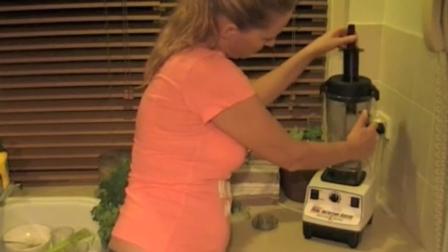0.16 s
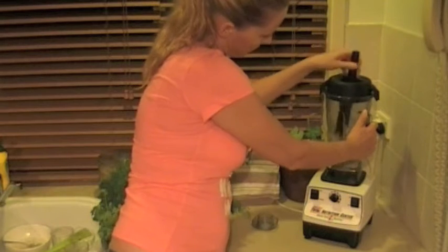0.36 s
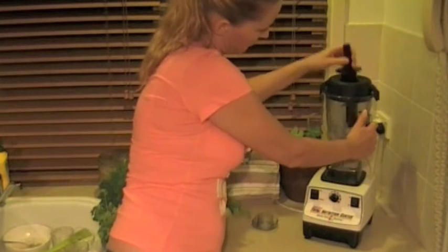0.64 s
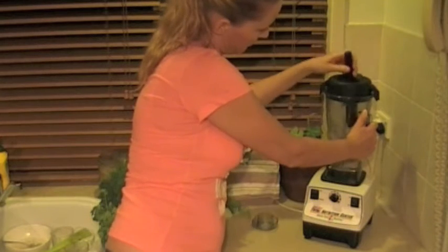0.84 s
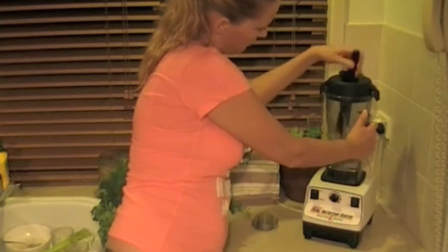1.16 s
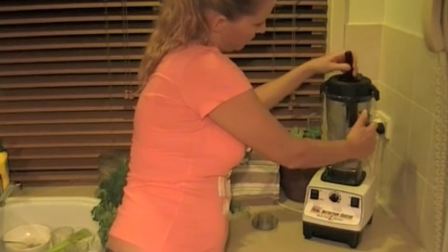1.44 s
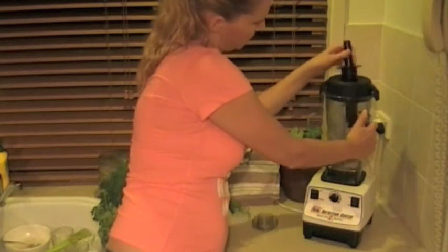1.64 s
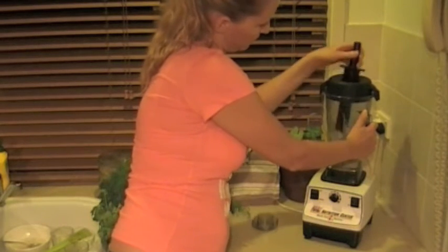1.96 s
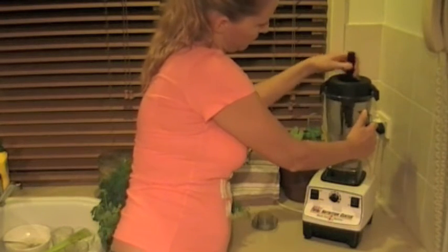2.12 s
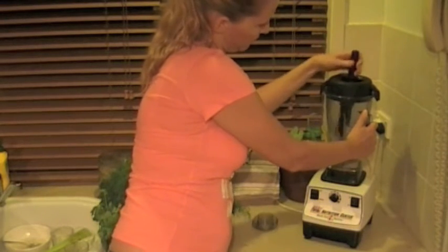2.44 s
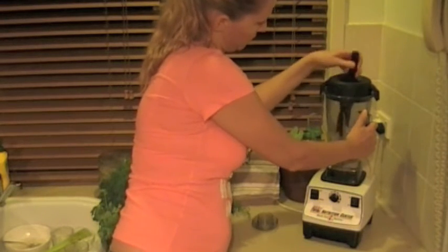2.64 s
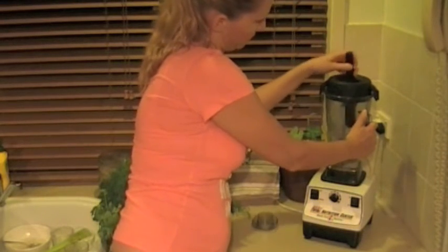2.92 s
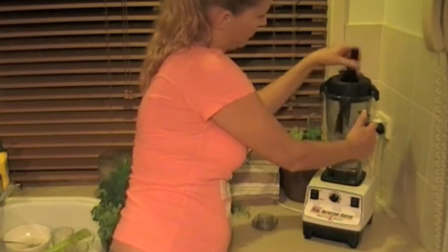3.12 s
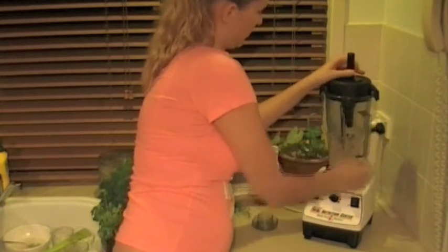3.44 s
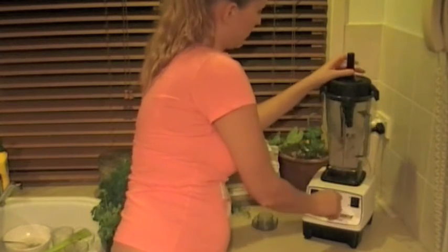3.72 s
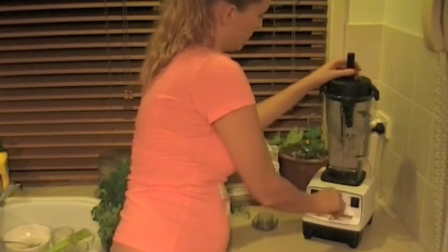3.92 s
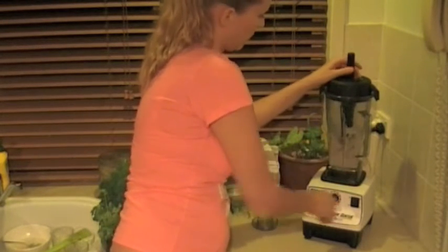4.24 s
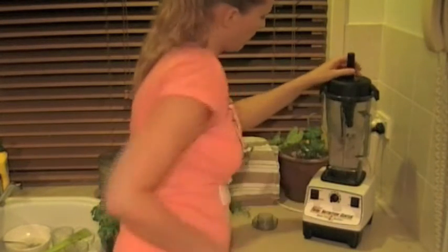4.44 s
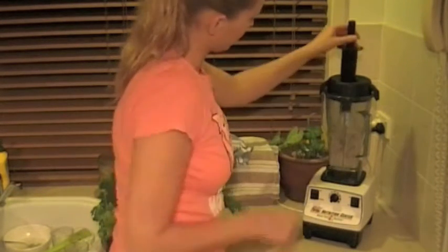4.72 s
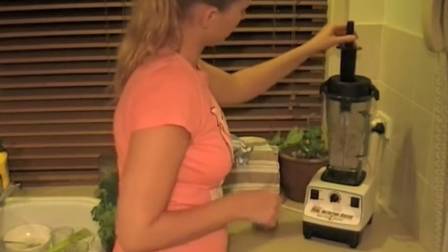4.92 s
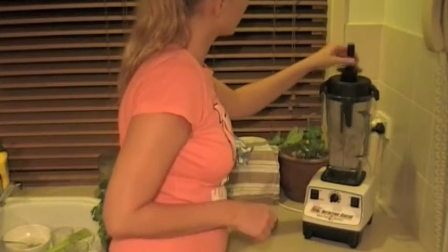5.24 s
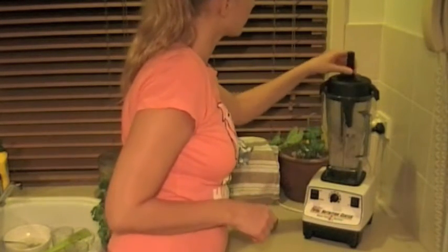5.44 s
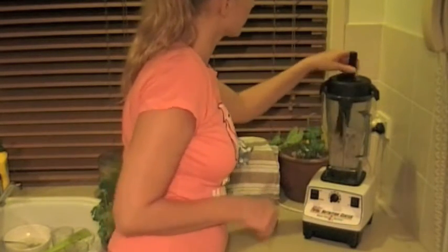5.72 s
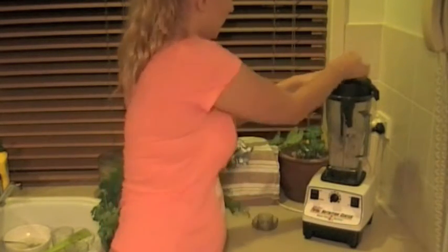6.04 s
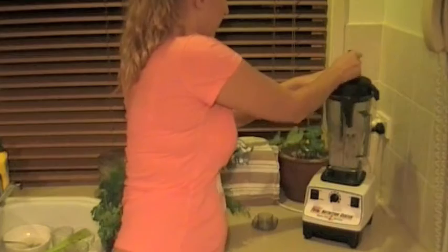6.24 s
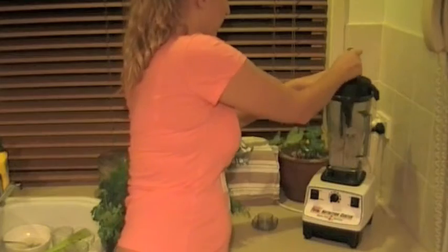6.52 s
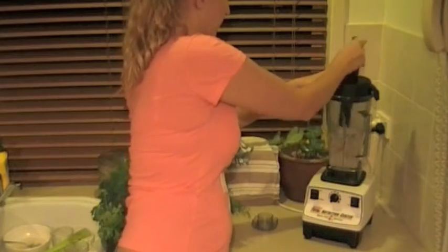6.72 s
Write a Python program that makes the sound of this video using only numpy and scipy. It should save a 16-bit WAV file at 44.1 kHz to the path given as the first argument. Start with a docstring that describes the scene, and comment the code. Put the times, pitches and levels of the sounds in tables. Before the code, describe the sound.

A blender runs on low, close by on a kitchen counter, buzzing and churning through greens with short dull thumps and faint gurgles. A little past halfway it switches to high and gets much louder, the motor sagging and recovering as the blades bite. About a second later it spins free, rising in pitch to a steadier whine with a bright rush of air. Tiled walls add brief reflections.

```python
"""A blender buzzes and churns on low in a tiled kitchen as a tamper pushes greens onto its blades.
The chopped mains shakes the motor and the blades ring the jar, with short thumps and faint gurgles.
Switched to high, the blades tear through the load and the shaft sags and recovers. Then it breaks
free and sings, with the rush of its fan and the whine of its commutator."""
import sys
import numpy as np
from scipy import signal
from scipy.fft import rfft, irfft
from scipy.io import wavfile
from scipy.ndimage import uniform_filter1d, map_coordinates

SR = 44100
rng = np.random.default_rng(int(sys.argv[2]) if len(sys.argv) > 2 else 0)


def store_pcm(level_fs):
    """Save levels as 16-bit WAV."""
    pcm = np.round(np.clip(level_fs, -1, 1) * 32767).astype(np.int16)
    wavfile.write(sys.argv[1], SR, np.atleast_2d(pcm).T)


N = 302967
T = np.arange(N) / SR
HZ = np.fft.rfftfreq(N, 1 / SR)
MAINS_HZ, FULL_SPEED_HZ = 50, 500
SWITCH_S, FREE_S = 3.77, 4.69  # the switch goes to high; the blades break free of the load

# Resonances and hollows of the jar and base. Each row: centre in Hz, width in Hz, lift in dB.
JAR_MODES = [(194, 10, -15), (327, 16, -1), (421, 38, -5), (455, 49, 8.5), (522, 54, 7), (570, 15, -19),
             (648, 20, -3), (758, 20, 4.5), (712, 22, 1), (900, 35, 4.5), (876, 23, 1), (969, 39, 3),
             (1059, 46, 6.5), (1180, 22, 0), (1266, 46, -3), (1449, 23, 4), (1702, 140, 3.5),
             (1898, 140, 5), (2483, 104, 4.5), (2883, 91, 3.5), (3250, 120, -1), (4840, 120, 4),
             (5054, 200, 2.5)]
# Resonances of the motor housing. Each row: centre in Hz, width in Hz, lift in dB.
HOUSING_MODES = [(3380, 90, 2), (3720, 300, 5.5), (6600, 300, 2.5), (7320, 170, 4), (8850, 220, 4),
                 (9600, 200, 2.5), (11020, 260, 2), (12200, 250, 1.5), (14180, 320, 4.2), (14620, 320, 3)]


def amp(db):
    """Decibels to gain."""
    return 10 ** (np.asarray(db) / 20)


def unit(x):
    """Scales to rms 1."""
    return x / np.sqrt(np.mean(x ** 2) + 1e-20)


def bumps(resonances, at=HZ):
    """Lift in dB of a set of resonances at the given frequencies."""
    return sum(lift / (1 + (2 * (at - hz) / width) ** 2) for hz, width, lift in resonances)


def spectrum(points, resonances=()):
    """An EQ curve in dB: a broad slope with resonant bumps on it."""
    hz, db = np.transpose(points)
    return np.interp(np.log(HZ + 1), np.log(hz), db) + bumps(resonances)


def colour(x, db):
    """Filters x by an EQ curve in dB."""
    return irfft(rfft(x) * amp(db), N)


def wander(rate_hz):
    """Smooth random drift of rms 1, rolling off above rate_hz."""
    return unit(irfft(rfft(rng.standard_normal(N)) / (1 + (HZ / rate_hz) ** 4), N))


def after(s, fade_s):
    """Fades from 0 to 1 around the time s."""
    return .5 + .5 * np.tanh((T - s) / fade_s)


def stages():
    """Crossfades for the three stages: on low, biting on high, spinning free."""
    high, free = after(SWITCH_S, .017), after(FREE_S, .03)
    return np.array([1 - high, high * (1 - free), high * free])


def staged(low_db, biting_db, free_db, speed=FULL_SPEED_HZ, db_per_octave=0):
    """A layer's fader in dB: the level of each stage at full speed, moved by the shaft speed."""
    return np.array([low_db, biting_db, free_db]) @ stages() + db_per_octave * np.log2(speed / FULL_SPEED_HZ)


def swells(rows, attack_s, release_s):
    """Fader moves in dB. Each row: start in seconds, length in seconds, lift in dB."""
    return sum(db * (1 - np.exp(-np.clip(T - s, 0, length) / attack_s))
               * np.exp(-np.maximum(T - s - length, 0) / release_s) for s, length, db in rows)


def rough_tone(cycles, width_hz, rough):
    """A tone whose level and phase shake; rough is the noisy share of its power."""
    shake = np.sqrt(1 - rough) + np.sqrt(rough / 2) * (wander(width_hz) + 1j * wander(width_hz))
    return np.sqrt(2) * (shake * np.exp(2j * np.pi * (cycles + rng.random()))).real


def spatter(per_s, spread_db, share):
    """Small impacts of uneven size in a bed of turbulence; share is their part of the power."""
    hits = (rng.random(N) < per_s / SR) * rng.choice([-1, 1], N)
    sizes = amp(spread_db * np.minimum(rng.exponential(1, N), 3))
    return np.sqrt(share) * unit(hits * sizes) + np.sqrt(1 - share) * rng.standard_normal(N)


def air_pockets(x, depth_db):
    """Pockets of air open and close in the pulp, so different pitches swell at different moments."""
    bands = signal.stft(x, nperseg=512, noverlap=384)[2]
    pockets = uniform_filter1d(rng.standard_normal(bands.shape), size=9, axis=0)
    pockets = unit(uniform_filter1d(pockets, size=14, axis=1))
    depth = np.interp(np.linspace(0, T[-1], bands.shape[1]), T, depth_db)
    return unit(signal.istft(bands * amp(depth * pockets), nperseg=512, noverlap=384)[1][:N])


def kitchen(x, t60=.25):
    """Dense reflections from tiles and counter."""
    t = np.arange(SR // 2) / SR
    taps = rng.standard_normal(len(t)) * (rng.random(len(t)) < 2000 / SR)
    taps *= amp(-60 * t / t60) * (t > .002)
    return signal.fftconvolve(x, taps / np.linalg.norm(taps))[:N]


def mains_buzz(hum_db=-73.5):
    """The speed control chops the mains and shakes the windings; bypassed on high, it leaves a hum."""
    # Mains harmonics on low. Each row: pitch in Hz, level in dB.
    harmonics = [(200, -73), (300, -71), (400, -66), (500, -47), (600, -48.3), (700, -53.5), (800, -59),
                 (900, -59), (1000, -55)]
    high = after(SWITCH_S, .017)
    buzz = sum(amp(db) * rough_tone(hz * T, width_hz=4, rough=.05) for hz, db in harmonics)
    hum = rough_tone(4 * MAINS_HZ * T, width_hz=8, rough=.3)
    return buzz * (1 - high) + amp(hum_db) * hum * high


def thumps_and_gurgles(rise_s=.011):
    """Short, damped thumps against the jar, and a few longer, faint low gurgling rings."""
    # Each row: time in seconds, level in dB, pitch in Hz, decay in seconds.
    events = [(.35, -48, 332, 0.051), (.718, -53, 380, .02), (.892, -53, 210, 0.018),
              (1.272, -52, 278, 0.02), (1.506, -53, 250, 0.018), (1.576, -48, 248, 0.023),
              (1.68, -50, 332, 0.035), (1.801, -57, 260, 0.024), (2.45, -50, 310, 0.035),
              (3.11, -38, 385, 0.034), (3.238, -59, 248, 0.025), (3.491, -59, 143, 0.22),
              (4.8, -43, 394, 0.12), (5.05, -49, 376, 0.14)]
    out = np.zeros(N)
    for s, db, hz, decay_s in events:
        age = np.maximum(T - s + rise_s, 0)
        envelope = (1 - np.exp(-age / rise_s)) ** 2 * np.exp(-age / decay_s)
        width_hz = 2.5 / decay_s  # the longer it lasts, the clearer its pitch
        band = HZ / (HZ + hz) / (1 + ((HZ - hz) / width_hz) ** 2) ** 2
        body = unit(irfft(rfft(rng.standard_normal(N)) * band, N))
        out += amp(db) * envelope / envelope.max() * body
    return out


def fan_rush(speed, slip_db, flutter_db=1.36):
    """The fan's rush through the housing, fizzing with spray; on high it is steadier and rings more."""
    # Colour of the rush. Each row: frequency in Hz, gain in dB.
    rush_eq = [(300, -60), (3000, -11.5), (6000, -4), (8000, -3), (10000, -0.8), (12500, -0.5),
               (14000, 2.5), (15700, -0.2)]
    # Spray hits the jar wall. Each row: start in seconds, length in seconds, lift in dB.
    sprays = [(0, 2.9, 1.7), (0, .6, 1.5), (.12, 0.14, 2.7), (.65, 0.095, 5.5), (1.48, .07, 1),
              (1.675, .04, 2.6), (1.785, 0.028, 3.3), (2.39, 0.046, 3.5), (2.86, 0.049, 3),
              (3.1, 0.055, 3.5), (3.225, 0.046, 4), (4.59, .04, 1)]
    spray_band = (10000, 3100, 2.4)  # centre in Hz, width in Hz, lift in dB
    high = after(SWITCH_S, .012)
    unrest = 1 - .7 * high
    fizz = air_pockets(spatter(per_s=3000, spread_db=1, share=.13), depth_db=3 * unrest)
    fizz *= amp(flutter_db * unrest * wander(45))
    gentle = unit(colour(fizz, spectrum(rush_eq, [spray_band]) + .38 * bumps(HOUSING_MODES)))
    hard = unit(colour(fizz, spectrum(rush_eq, HOUSING_MODES)))
    level_db = staged(-37.5, -23.2, -23, speed, db_per_octave=8) + .84 * slip_db
    level_db += swells(sprays, attack_s=.0027, release_s=.012)
    return amp(level_db) * ((1 - high) * gentle + high * hard)


def motor(turns, speed, bars=22, growth_db_per_s=1.2):
    """The shaft sings, the coupling rattles, and the commutator bars whine past the brushes."""
    # Base resonances that the shaft tone glides through. Each row: centre in Hz, width in Hz, lift in dB.
    base_modes = [(441.5, 29, 14), (511.4, 24.9, 4)]
    # Rattle overtones. Each row: multiple of the shaft speed, relative level in dB.
    overtones = [(2, -2.5), (3, 2), (4, 2.3), (5, -2.5), (6, 0), (7, -2.5), (8, -1.5), (9, -6), (10, -4.5),
                 (14, -12), (18, -12)]
    # Tones swell or drop out. Each row: start and length in seconds, shaft and whine lifts in dB.
    surges = [(0.113, .21, 9.5, 13.5), (3.954, .1, 7, 5), (4.248, 0.14, 4, 4), (5.739, 0.027, -25, 5),
              (5.925, 0.26, -2.5, 1), (6.36, 0.22, 2.5, 0.5)]
    shaft_db, whine_db = (swells(np.array(surges)[:, [0, 1, lift]], attack_s=.0087, release_s=.0067)
                          for lift in (2, 3))
    shaft = rough_tone(turns, width_hz=22, rough=.06)
    shaft_db += staged(-57, -39.5, -36, speed, db_per_octave=30) + bumps(base_modes, speed)
    shaft_db += growth_db_per_s * np.maximum(T - FREE_S, 0)
    rattle = sum(amp(db) * rough_tone(k * turns, width_hz=4.5 * k, rough=.45) for k, db in overtones)
    rattle = unit(colour(rattle, 1.9 * bumps(JAR_MODES + HOUSING_MODES)))
    rattle_db = staged(-47.5, -32.5, -32.8)
    rattle_db += swells([(4.76, .584, 5.6)], attack_s=.03, release_s=.034)  # just after breaking free
    whine = rough_tone(bars * turns, width_hz=160, rough=.9)
    whine_db += staged(-50.5, -34.5, -35, speed, db_per_octave=17)
    return amp(shaft_db) * shaft + amp(rattle_db) * rattle + amp(whine_db) * whine


def once_a_turn(x, turns, memory):
    """The blades meet nearly the same pulp a turn later, so noise gathers at the shaft's overtones."""
    earlier = np.interp(turns - 1, turns, np.arange(N))
    return (x + memory * map_coordinates(x, [earlier], order=3)) / np.sqrt(1 + memory ** 2)


def blade_churn(turns, slip_db, heave_db=1.02, split_hz=1450):
    """Blades strike pulp and ring the jar: a low slosh and a bright chop, throbbing with each turn."""
    # Colour on low, biting on high and spinning free. Each row: frequency in Hz, gain in dB.
    low_eq = [(30, -58), (80, -42), (120, -29.5), (250, -21.5), (390, -16.5), (470, -9), (600, -10),
              (760, -4.5), (1050, -1.5), (1280, -2), (2800, 2), (4200, -3), (4900, -2), (6500, -5.5),
              (10000, -13)]
    biting_eq = [(30, -47), (100, -45), (200, -30), (330, -26.5), (470, -11.5), (600, -9.5), (850, 0.5),
                 (1250, -2), (2000, -4.5), (2900, 0.5), (4000, -2.5), (5000, -6.5), (6500, -6.5),
                 (10000, -19.5)]
    free_eq = [(30, -44), (100, -45), (200, -23), (330, -18), (400, -16.5), (520, -4.5), (640, -1),
               (780, 9.5), (950, -1.5), (1070, 5.5), (1280, -0.5), (2200, 0.5), (3700, 3.5), (5500, -3),
               (7000, -2), (10000, -11.5)]
    # The blades bite a chunk. Each row: start and length in seconds, slosh and chop lifts in dB.
    bites = [(0.233, 0.084, 0.5, 1.6), (.97, .05, 1, 2), (1.26, 0.021, 6.5, 2.5), (1.49, .035, 2, 2.5),
             (1.57, 0.023, 6, 3.5), (1.78, 0.031, 3, 2), (2.328, 0.018, 11, -1), (2.408, 0.024, 6.5, -0.5),
             (2.674, 0.023, 2, 0), (3.226, 0.086, 3, 1.5), (3.573, 0.41, 2.5, 1.3), (3.765, 0.16, 6, 2),
             (3.85, .045, -2.5, 1.3), (3.97, 0.093, 4.5, 2.5), (4.227, 0.13, 8, 3.5), (4.432, .18, 3, 2.5),
             (4.764, 0.12, 2, 1), (5.01, .07, -1.5, 3), (5.274, .06, 4, 2.5), (6.09, 0.12, 3, -0.1),
             (6.297, 0.044, 1, 1), (6.413, .17, 0.5, 1)]
    high, free = after(SWITCH_S, .012), after(FREE_S, .03)
    mains_pulse = .069 * (1 - high) * np.cos(2 * np.pi * 2 * MAINS_HZ * T)
    throb = 1 + mains_pulse + .24 * np.cos(2 * np.pi * turns)
    lumps = 1 - .5 * free  # the smoother the pulp, the steadier its sound
    blows = once_a_turn(spatter(per_s=3000, spread_db=2.5, share=.29), turns, memory=.15 * free)
    blows = air_pockets(blows, depth_db=.93 * lumps) * throb * amp(.68 * lumps * wander(100))
    slosh_db, chop_db = (swells(np.array(bites)[:, [0, 1, lift]], attack_s=.0094, release_s=.012)
                         for lift in (2, 3))
    slosh_db += staged(-37, -32.5, -31) + slip_db + heave_db * wander(11)
    chop_db += staged(-32.5, -24, -25) + slip_db
    lowpass = 1 / (1 + (HZ / split_hz) ** 10)
    out = np.zeros(N)
    for eq, weight in zip([low_eq, biting_eq, free_eq], stages()):
        ringing = rfft(blows) * amp(spectrum(eq, JAR_MODES))
        slosh = unit(irfft(ringing * lowpass, N))
        chop = unit(irfft(ringing * (1 - lowpass), N))
        out += weight * (amp(slosh_db) * slosh + amp(chop_db) * chop)
    return out


def scene(noise_wet_db=-10, tone_wet_db=-13):
    """The blender close up on the counter, leaning slightly left, with reflections for width."""
    # Shaft speed, sagging as the blades bite. Each row: time in seconds, turns per second.
    speed_low = [(0, 416), (.4, 413), (1.05, 470), (1.8, 440), (2.1, 480), (2.55, 430), (2.88, 492),
                 (3.2, 490), (3.45, 360)]
    speed_high = [(3.9, 345), (4.01, 386), (4.17, 340), (4.38, 406), (4.45, 437), (4.65, 440), (4.73, 503),
                  (4.92, 487), (5.4, 490), (5.53, 532), (5.72, 503), (6.03, 534), (6.18, 545), (6.45, 508),
                  (6.6, 502), (6.87, 525)]
    # The blades slip in an air pocket. Each row: start in seconds, length in seconds, dip in dB.
    slips = [(.63, .11, -2.5), (1.385, .055, -3), (2.25, .035, -3), (2.565, 0.056, -0.5),
             (3.04, 0.059, -1.5), (4.08, 0.066, -2), (4.66, 0.058, -5), (6.755, 0.057, -3)]
    # Stereo lean. Each row: frequency in Hz, left minus right in dB.
    balance = [(110, 0), (380, 2), (700, 1.5), (2400, 1.5), (4400, .5), (8000, 0)]
    # Stereo width. Each row: frequency in Hz, gain of the side reflections in dB.
    side_eq = [(100, -14), (350, -21), (1300, -19.5), (2300, -15), (4500, -14), (6300, -21), (10000, -22),
               (11200, -16), (13500, -26), (15500, -16)]
    speed = np.interp(T, *np.transpose([*speed_low, *speed_high]))
    jitter = .00204 + .004 * (1 - after(FREE_S, .032))  # chunks jolt the shaft until it spins free
    turns = np.cumsum(speed * (1 + jitter * wander(15.38))) / SR
    slip_db = swells(slips, attack_s=.017, release_s=.0065)
    noise = blade_churn(turns, slip_db) + fan_rush(speed, slip_db) + thumps_and_gurgles()
    tones = motor(turns, speed) + mains_buzz()
    mid = noise + tones + kitchen(amp(noise_wet_db) * noise + amp(tone_wet_db) * tones)
    side = colour(kitchen(noise + tones), spectrum(side_eq))
    lean_db = spectrum(balance) / 2
    return np.array([colour(mid + side, lean_db), colour(mid - side, -lean_db)])


def record(dry, ceiling=.66, cutoff_hz=15760):
    """Rounds off only the highest peaks, then cuts the very top of the treble."""
    rounded = dry / (1 + (dry / ceiling) ** 10) ** (1 / 10)
    lowpass = signal.firwin(1023, cutoff_hz, window=("kaiser", 9), fs=SR)
    return signal.oaconvolve(rounded, lowpass[None], "same")


dry = scene()
out = record(dry)
store_pcm(out)
```